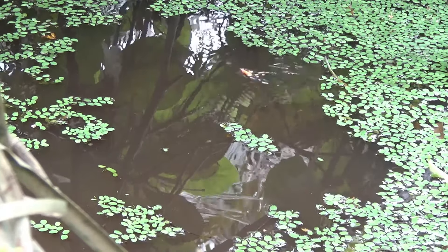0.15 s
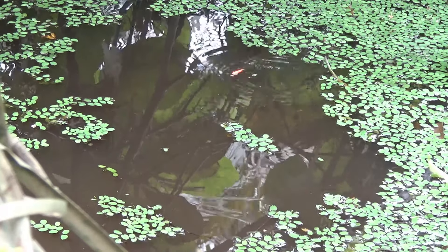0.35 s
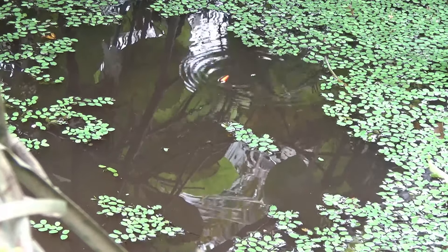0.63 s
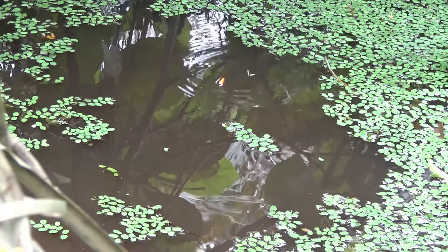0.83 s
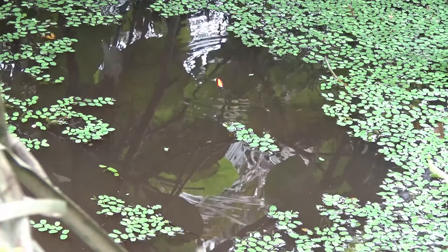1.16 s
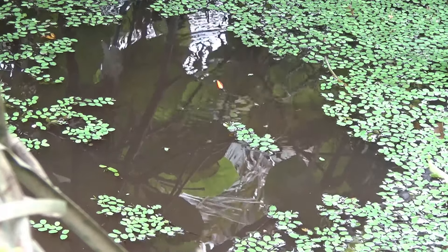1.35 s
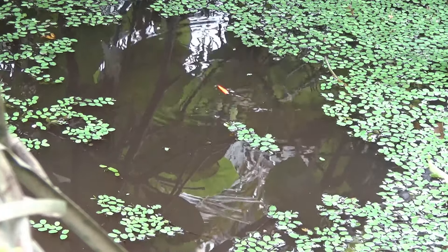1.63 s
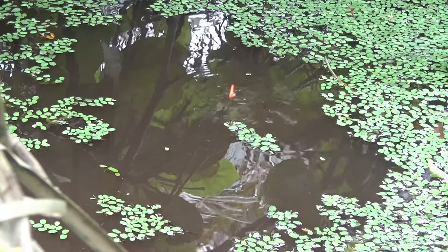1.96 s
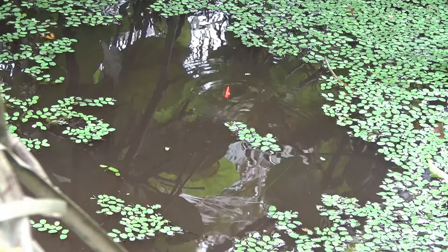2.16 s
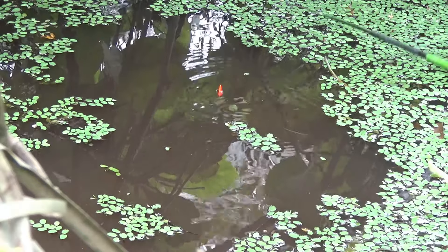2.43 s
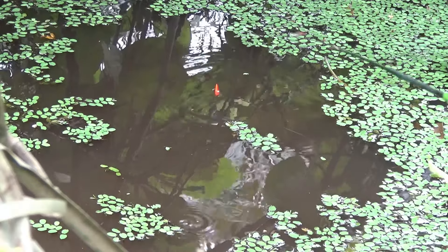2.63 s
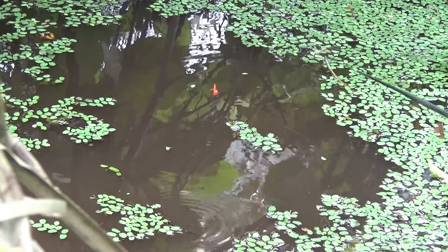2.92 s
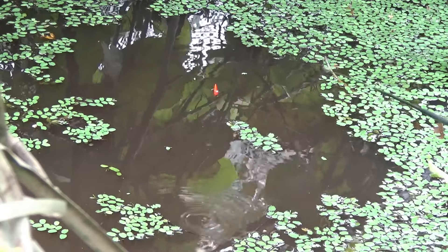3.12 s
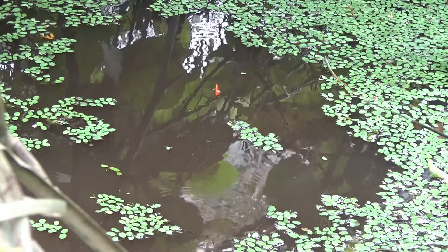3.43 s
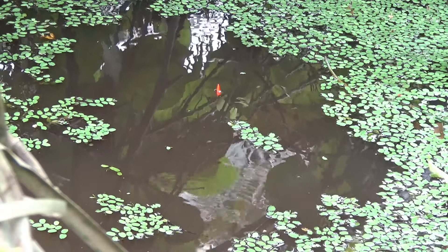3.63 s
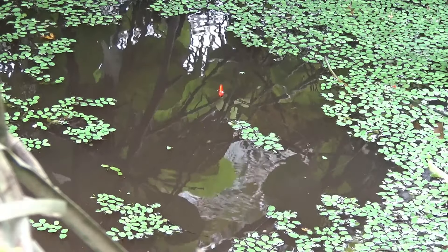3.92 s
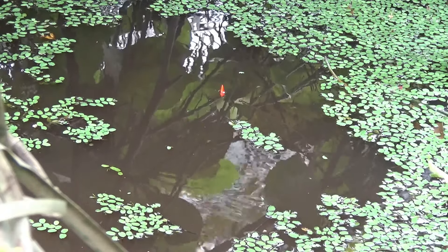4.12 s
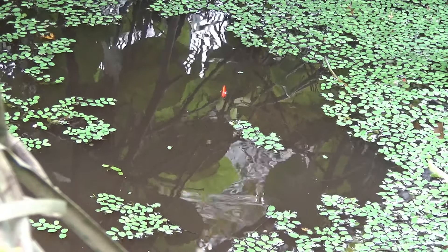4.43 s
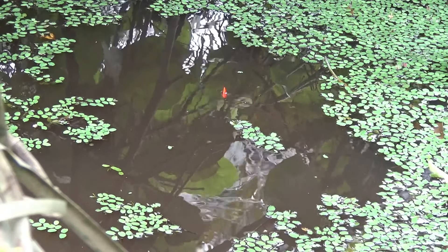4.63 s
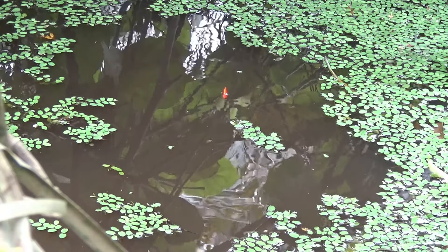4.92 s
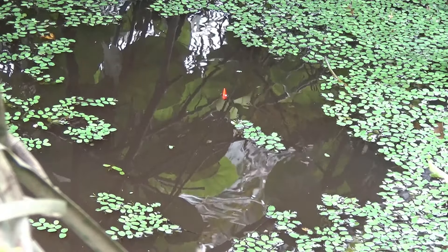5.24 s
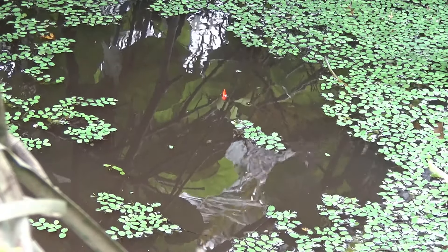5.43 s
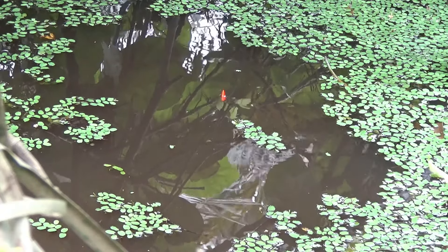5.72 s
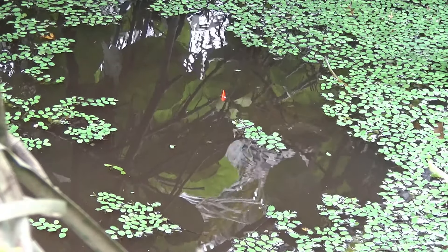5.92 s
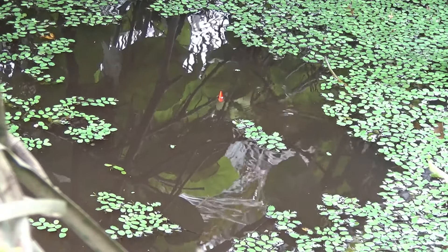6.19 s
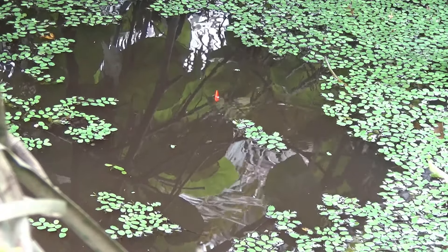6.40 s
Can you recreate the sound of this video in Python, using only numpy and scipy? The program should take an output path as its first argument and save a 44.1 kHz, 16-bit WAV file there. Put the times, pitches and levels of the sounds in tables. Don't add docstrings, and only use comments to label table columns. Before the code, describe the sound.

Continuous piercing cicada shimmer dominates, heard on a small stereo camera microphone outdoors. Beneath it lie a purring cricket, a fast dry ticking insect that later stops, and a faint wavering low engine hum with soft breeze rumble. Nine brief falling whistles from a bird among the trees recur regularly with leafy echoes. A nearer bird gives sparse quick chips, clustered after four seconds, and a few tiny water drips barely surface.

```python
import sys
import numpy as np
from scipy import signal
from scipy.fft import rfft, irfft
from scipy.io import wavfile
from scipy.ndimage import uniform_filter1d

SR = 44100
rng = np.random.default_rng(int(sys.argv[2]) if len(sys.argv) > 2 else 0)


def unload_audio(sound):
    columns = np.transpose(np.atleast_2d(sound))
    steps = np.round(np.clip(columns, -1, 1) * 32767)
    wavfile.write(sys.argv[1], SR, steps.astype(np.int16))


def boost(x):
    u = np.asarray(x, float) / 20
    return 10 ** u


N = 289340

# frequency in Hz, level in dB.
CHORUS_SPECTRUM = [(5500, -31), (5700, -27), (6050, -20), (6400, -13), (6520, -5.5), (6700, -7.5),
                   (6850, -2), (7450, 0), (7950, -3), (8250, -7.5), (8330, -12), (8700, -17.5), (9500, -24),
                   (10500, -38.5)]
# frequency in Hz, level in dB.
OVERTONE_SPECTRUM = [(12500, -42), (12950, -6), (13000, 0), (13500, 3), (14100, 5), (14900, 1), (15300, 4),
                     (15800, -8)]
# time in seconds, groups per second.
TRILL_PACE = [(0, 16.9), (.8, 16.9), (1.2, 16.5), (2.3, 16.2), (4.5, 16.28), (5.8, 15.6), (6.56, 15)]
# place in the group from 0 to 1, level in dB.
WING_STROKES = [
    (.17, -5),
    (.38, -2),
    (.6, 0),
]
# start in seconds, peak level in dB.
FALLING_WHISTLES = [(0.272, -46), (0.898, -43), (1.4985, -45), (2.241, -44.5), (2.986, -46), (3.670, -43.5),
                    (4.426, -45), (5.1115, -43.5), (5.792, -43.5)]
# start in seconds, length in seconds, first Hz, last Hz, level in dB.
RISING_CHIPS = [(.042, .008, 4700, 5500, -45), (0.624, 0.02, 3940, 6130, -47),
                (1.312, .009, 5000, 5700, -56), (2.807, .012, 5600, 6300, -57),
                (3.254, .007, 4300, 5200, -56), (3.9, 0.032, 4930, 5760, -55),
                (4.158, 0.02, 5500, 5860, -43), (4.166, 0.012, 7710, 7700, -30),
                (4.227, 0.018, 5300, 6150, -45), (4.603, 0.018, 5330, 6050, -56),
                (4.881, .026, 5040, 5720, -50), (4.91, 0.012, 5570, 6360, -45)]
# start in seconds, length in seconds, first Hz, last Hz, level in dB.
BUBBLES = [
    (1.577, .009, 700, 1300, -53),
    (3.293, .007, 3220, 3450, -53),
    (4.228, 0.0056, 2640, 2330, -45.5),
    (5.985, .025, 2140, 2220, -63),
]
# multiple of the shaft rate, level in dB, waver in dB.
SHAFT_ORDERS = [(1, -67.5, -2.5), (5, -73, 4), (6, -81, 4.5), (7, -83, 3), (9, -75, 3.5)]
# time in seconds, level in dB.
FIRING_CARRY = [(0.0, -65), (0.29, -56.5), (0.75, -56.5), (0.89, -73), (0.99, -59.5), (1.48, -54),
                (1.97, -62), (3.0, -55.5), (3.14, -65), (3.49, -53), (4.26, -63), (4.29, -57.5),
                (5.35, -60), (5.39, -69), (5.79, -55), (6.05, -67), (6.1, -54.5), (6.56, -58.5)]
# frequency in Hz, width in Hz, level in dB.
BLURRED_TONES = [(58, 19, -69.5), (135.5, 15, -62.5), (1160, 90, -71), (4900, 69, -70.5)]
# frequency in Hz, level in dB.
RUMBLE_SPECTRUM = [(15, -32), (30, -14), (60, -8), (100, -5.5), (140, -7), (200, -9.5), (300, -9.5),
                   (450, -20), (900, -49)]
# time in seconds, extra rumble in dB.
PUFFS = [
    (1.52, 0),
    (2.33, 5),
    (3.38, 2),
    (5.08, 3.5),
    (5.52, 4.5),
]
# frequency in Hz, level in dB per Hz.
AIR_SPECTRUM = [(15, -36), (60, -32), (200, -29.5), (450, -20), (1000, -21.5), (2000, -25), (4000, -25.5),
                (5600, -30), (8000, -29.5), (10200, -32), (12300, -35), (15700, -42)]
# frequency in Hz, likeness from 0 to 1.
LIKENESS = [(60, 1.0), (120, 0.98), (240, 0.82), (480, 0.39), (950, 0.1), (1890, 0.35), (3770, 0.59),
            (7520, 1), (15000, 1)]

T = np.arange(N) / SR


def evened(x):
    return x / np.sqrt(np.mean(x ** 2) + 1e-20)


def read(points, hz):
    f, value = np.transpose(points)
    return np.interp(np.log(hz + 1), np.log(f + 1), value)


def curve(rows):
    s, value = np.transpose(rows)
    return np.interp(T, s, value)


def bell(x):
    return np.exp(-.5 * x ** 2)


def add(mix, s, sound, pan_db):
    part = mix[:, round(s * SR):][:, :np.shape(sound)[-1]]
    part += sound[..., :part.shape[1]] * boost(np.array([[pan_db / 2], [-pan_db / 2]]))


def resonate(x, hz, width_hz):
    return signal.lfilter(*signal.iirpeak(hz, hz / width_hz, SR), x)


def slow(rate_hz):
    knots = rng.standard_normal(400)
    return evened(np.interp(T * rate_hz, np.arange(400), knots))


def hiss(shape, db, patchy_db):
    frames, hz = N // 512 + 5, np.fft.rfftfreq(2048, 1 / SR)
    a, b, c, d, patches = rng.standard_normal((frames, 1025, 5)).T
    patches = uniform_filter1d(patches, size=20, axis=0)
    patches = evened(uniform_filter1d(patches, size=10, axis=1))
    same = np.clip(read(LIKENESS, hz), 0, 1)[:, None]
    mid = (a + 1j * b) * np.sqrt(1 + same)
    side = (c + 1j * d) * np.sqrt(1 - same)
    level_db = read(shape, hz)[:, None] + patchy_db * patches
    spectra = np.array([mid + side, mid - side]) * boost(level_db)
    noise = signal.istft(spectra, nperseg=2048, noverlap=1536)[1][:, :N]
    return boost(db) * evened(noise)


def whistle(hz, db, overtone_db, rough, soft):
    flutter = uniform_filter1d(uniform_filter1d(rng.standard_normal(6000), size=70), size=70)
    phase = 2 * np.pi * np.cumsum(hz) / SR
    tone = np.sin(phase) + boost(overtone_db) * np.sin(2 * phase)
    level = boost(db) * (1 + rough * evened(flutter)[:len(hz)])
    return level * tone * signal.windows.tukey(len(hz), soft)


def trees(x, wet_db, t60, twigs_db, alike):
    u = np.arange(SR // 2) / SR
    twigs = boost(twigs_db - 60 * u / .05)
    trunks = boost(-60 * u / t60) * np.clip(u / 0.0083, 0, 1)
    taps = rng.standard_normal((2, len(u))) * (twigs + trunks)
    taps = taps + alike * taps[::-1]
    return boost(wet_db) * signal.fftconvolve(x[None], taps / np.linalg.norm(taps[0]), axes=1)


def cicadas(count=90, clicks_per_s=500, width_hz=45, throb=0.27, scatter=0.34, pan_db=-.4):
    level_db = -37.78 + 0.0531 * T + 0.76 * slow(2.37)
    slots = 8192
    t = np.arange(slots) / slots * N / SR
    offset_hz = np.fft.fftshift(np.fft.fftfreq(slots, N / SR / slots))
    bins = np.zeros((2, N // 2 + 1), complex)
    for hz, (rate, turn) in zip(np.linspace(5500, 10500, count), rng.random((count, 2))):
        a, b = rng.standard_normal((2, 2, slots))
        struck = rng.random((2, slots)) < clicks_per_s * N / SR / slots
        clicks = (a + 1j * b) * struck
        clicks *= 1 + throb * np.sin(2 * np.pi * ((19 + 12 * rate) * t + turn))
        drum = boost(read(CHORUS_SPECTRUM, hz)) * bell(offset_hz / width_hz)
        low = int(hz * N / SR) - slots // 2
        bins[:, low:low + slots] += np.fft.fft(clicks) * drum
    mid, side = irfft(bins, N)
    mid, side = evened(mid), scatter * evened(side)
    return boost(level_db) * np.array([(mid + side) * boost(pan_db / 2), (mid - side) / boost(pan_db / 2)])


def cicada_overtone():
    return hiss(OVERTONE_SPECTRUM, -65, 1.1)


def cricket(wing_hz=6594, stroke_s=0.0027, drone_hz=6640, drone_db=-58):
    groups_per_s = curve(TRILL_PACE)
    place = np.cumsum(groups_per_s) / SR % 1
    strokes = sum(boost(db) * bell((place - at) / groups_per_s / stroke_s) for at, db in WING_STROKES)
    wing = np.sin(2 * np.pi * wing_hz * T + 1.6 * slow(45)) * boost(1.5 * slow(30))
    drone = evened(resonate(rng.standard_normal(N), drone_hz, 10))
    tiring_db = -46 - 1.05 * T
    return boost(tiring_db) * evened(strokes * wing) + boost(drone_db) * drone


def ticker(hz=2531, db=-54, weak_db=-1.5, spread_db=1.0, rise_s=0.00084, t60=0.033):
    out, u = np.zeros((2, N)), np.arange(2000) / SR
    tick = (1 - np.exp(-u / rise_s)) ** 2 * boost(-60 * u / t60) * np.sin(2 * np.pi * hz * u)
    tick /= tick.max()
    times = np.arange(.0192, 4.19, .04002)
    for k, (s, luck) in enumerate(zip(times, rng.standard_normal(len(times)))):
        stroke_db = db + weak_db * (k % 2) + spread_db * luck
        add(out, s, (-1) ** k * tick * boost(stroke_db), -1.5)
    return out


def far_bird(length_s=.096, knee_s=.043, knee_hz=4330, rise_s=0.0027):
    out, u = np.zeros((2, N)), np.arange(0, length_s, 1 / SR)
    hz = knee_hz - 18000 * (u - knee_s) - 4.2e6 * (u - knee_s) ** 3
    leafy = bell((hz - 4600) / 1300)
    for s, peak_db in FALLING_WHISTLES:
        db = peak_db - 10 - 41 * u
        call = np.minimum(u / rise_s, 1) * whistle(hz, db, -40, rough=.4, soft=.06)
        add(out, s, call, 10.5)
        add(out, s, trees(call * leafy, 8.05, 0.86, twigs_db=5.5, alike=0.32), 1.8)
    return out


def near_bird(loud_db=-43):
    out = np.zeros((2, N))
    for s, length, first_hz, last_hz, db in RISING_CHIPS:
        octave_db = -16 + 1.5 * min(db - loud_db, 0)
        octave_db -= 30 * (first_hz > 7000)
        rise = np.linspace(0, 1, round(length * SR)) ** .6
        chip = whistle(first_hz + (last_hz - first_hz) * rise, db - 4, octave_db, rough=.5, soft=.4)
        add(out, s, chip, 0)
        add(out, s, trees(chip, 4.1, 0.24, 7.8, 0.36), .1)
    return out


def drips():
    out = np.zeros((2, N))
    for s, length, first_hz, last_hz, db in BUBBLES:
        hz = np.linspace(first_hz, last_hz, round(length * SR))
        plip = whistle(hz, db, -30, rough=.15, soft=.5)
        add(out, s, plip, 1.5)
        add(out, s, trees(plip, -3.5, 0.15, 9, 0.4), .1)
    return out


def engine(shaft_hz=42.0):
    turn = 2 * np.pi * np.cumsum(shaft_hz * (1 + 0.00403 * slow(1.468))) / SR
    lines = np.zeros(N)
    for k, db, waver_db in SHAFT_ORDERS:
        lines += boost(db + 4 + waver_db * slow(4.5)) * np.sin(k * turn + k * k)
    lines += boost(curve(FIRING_CARRY) + 2.5) * np.sin(2 * turn)
    fourth_db = -58 - 5.5 * abs(slow(7))
    lines += boost(fourth_db) * np.sin(4 * turn + 1.24)
    for hz, width_hz, db in BLURRED_TONES:
        lines += boost(db) * evened(resonate(rng.standard_normal(N), hz, width_hz))
    return lines


def rumble(puff_s=0.14):
    puffs_db = sum(db * bell((T - s) / puff_s) for s, db in PUFFS)
    return boost(-62 + puffs_db + 0.66 * slow(6)) * hiss(RUMBLE_SPECTRUM, 2.3, 0.94)


def open_air(lull_s=4.3):
    growing_db = -60.5 + 0.2532 * np.minimum(T, lull_s)
    lull_db = -1.3 * np.clip((T - lull_s) / 0.24 + .5, 0, 1)
    return boost(growing_db + lull_db) * hiss(AIR_SPECTRUM, 6, 0.62)


def scene():
    insects = cicadas() + cicada_overtone() + cricket() + ticker()
    return insects + far_bird() + near_bird() + drips() + engine() + rumble() + open_air()


def low_pass(x):
    return signal.sosfilt(signal.butter(12, 16090, fs=SR, output="sos"), x)


def record(dry):
    mid, side = rfft(dry[0] + dry[1]) / 2, rfft(dry[0] - dry[1]) / 2
    hz = np.fft.rfftfreq(N, 1 / SR)
    mid, side = mid * (hz < 15760), side * (hz < 9500)
    mix = irfft(np.array([mid + side, mid - side]), N)
    return low_pass(mix)


dry = scene()
out = record(dry)
unload_audio(out)
```